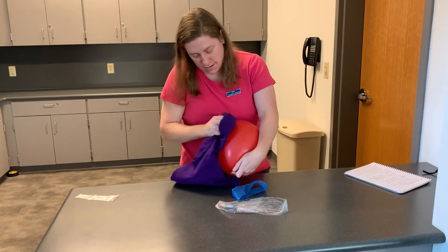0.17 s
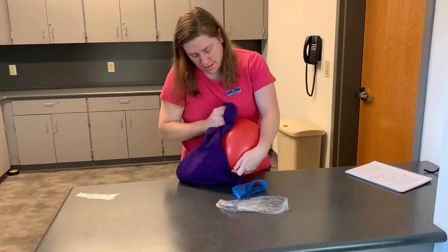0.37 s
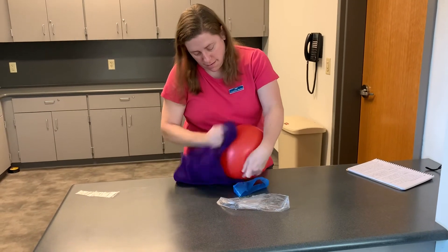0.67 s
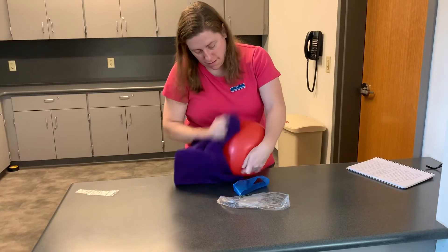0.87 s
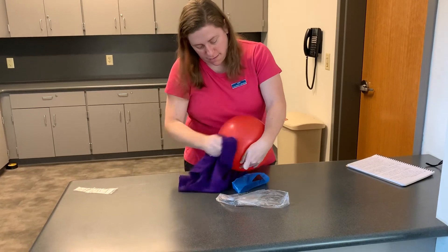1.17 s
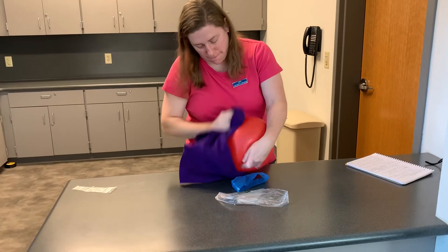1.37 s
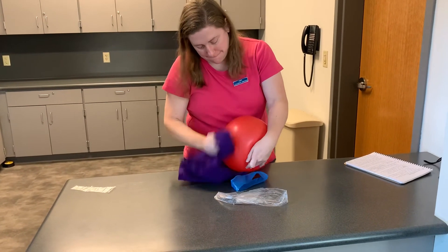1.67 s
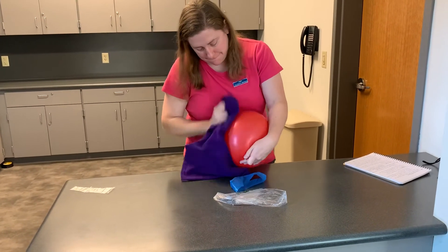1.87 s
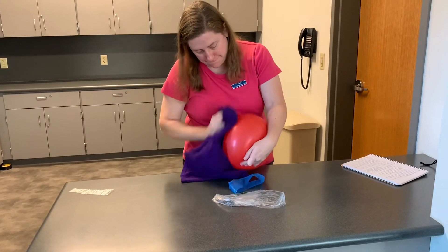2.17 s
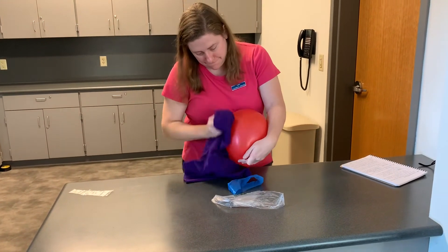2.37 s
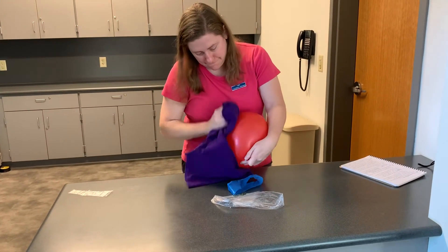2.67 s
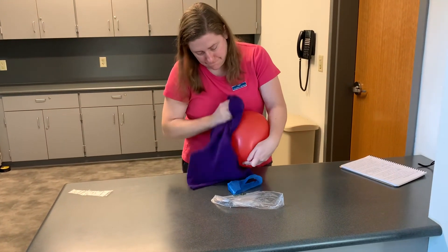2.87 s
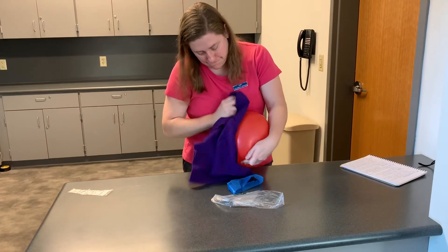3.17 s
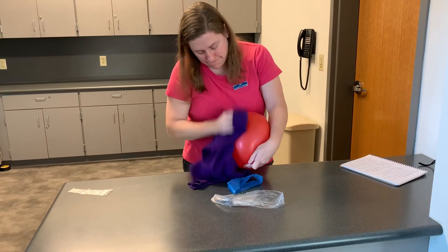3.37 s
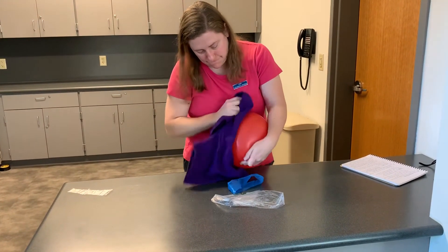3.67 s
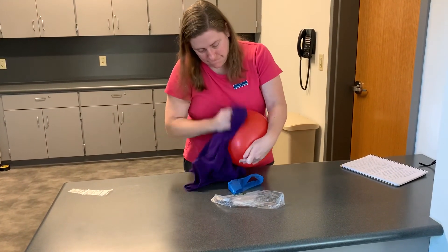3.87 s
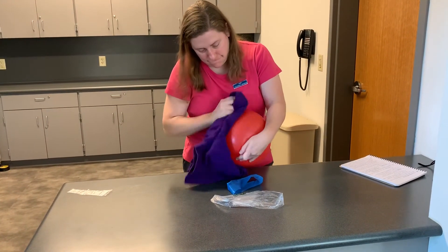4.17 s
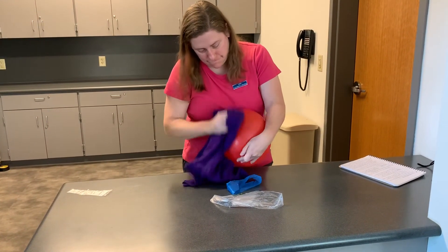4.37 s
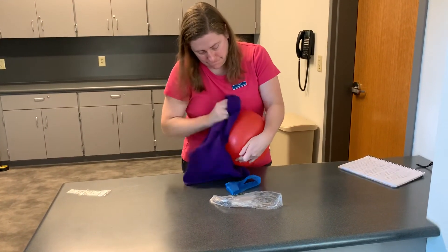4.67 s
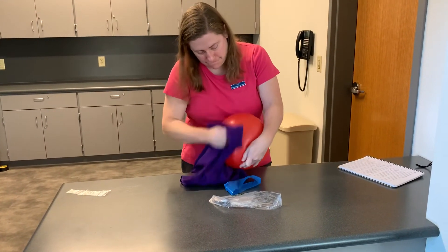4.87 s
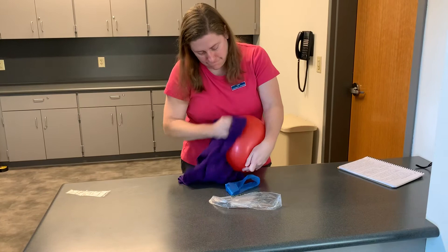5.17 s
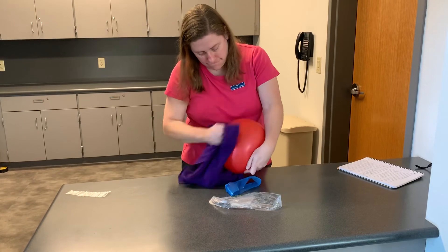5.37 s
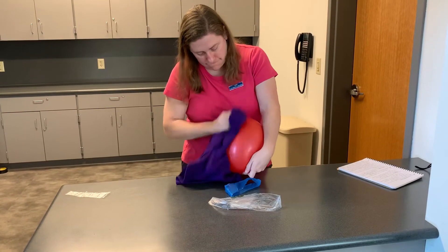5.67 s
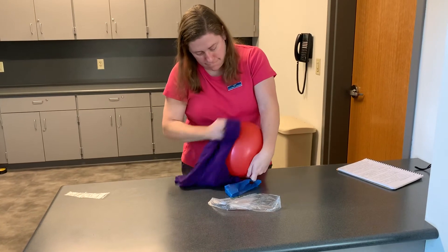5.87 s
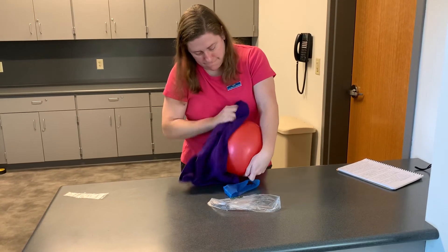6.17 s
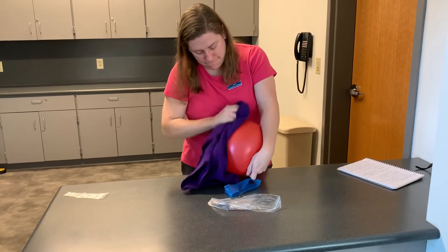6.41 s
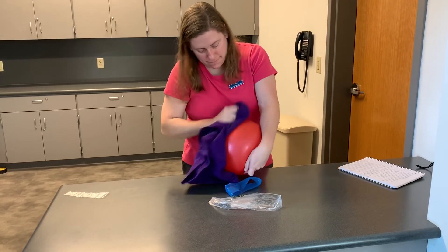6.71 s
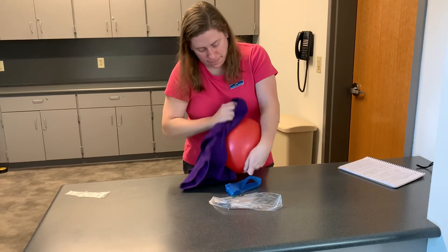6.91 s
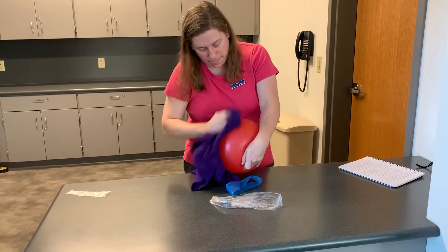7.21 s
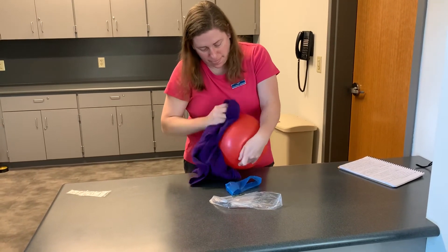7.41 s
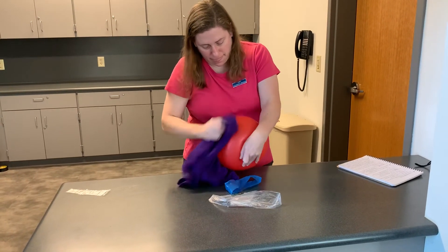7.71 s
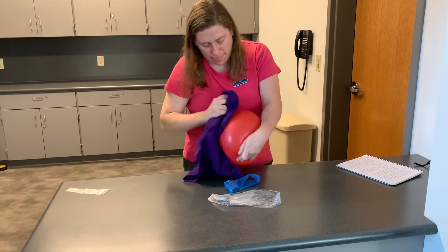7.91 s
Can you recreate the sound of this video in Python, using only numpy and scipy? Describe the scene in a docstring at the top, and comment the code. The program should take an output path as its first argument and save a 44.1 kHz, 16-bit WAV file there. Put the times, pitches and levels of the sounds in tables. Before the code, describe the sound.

A fuzzy cloth is rubbed rapidly back and forth on an inflated balloon, about eight strokes a second throughout. Each stroke is a short bright hiss with a coarser scrape and a hollow rubbery drumming underneath. Occasional soft double thumps ring the balloon. Close stereo pickup in a hard kitchen with a short reverberation, over low steady ventilation rumble.

```python
"""A fuzzy scrub goes to and fro, about eight strokes a second: a fleecy cloth on an inflated balloon. Fibres
hiss as shaped noise; coarser pile scrapes, and slips of the rubber ring the air and skin as resonances. Now and
then the fist bumps the balloon with soft paired pushes, and a hard-walled kitchen answers in decaying noise.
Ventilation rumbles behind as filtered noise, and a thin high sine comes and goes. All of it is heard in left
and right, and the treble reaches the two sides at different times."""
import sys
import numpy as np
from scipy import signal
from scipy.fft import rfft, irfft, next_fast_len
from scipy.io import wavfile
from scipy.ndimage import uniform_filter1d, map_coordinates

SR = 44100
rng = np.random.default_rng(int(sys.argv[2]) if len(sys.argv) > 2 else 0)


def bounce(signal):
    """Save signal as a 16-bit WAV file at the path given by the first command-line argument."""
    frames = np.transpose(np.atleast_2d(signal))
    limited = np.clip(frames, -1, 1)
    pcm = np.round(limited * 32767).astype(np.int16)
    wavfile.write(sys.argv[1], SR, pcm)


N = 355004

# strokes of the cloth, alternately away and back: middle_s, length_s, hiss_db (fibres), drum_db (balloon)
STROKES = [(0.053, 0.059, -43, -43), (0.155, 0.071, -49, -51), (0.254, 0.066, -78, -56.5),
           (0.354, 0.051, -42.0, -41.3), (0.449, 0.089, -53, -51.5), (0.577, 0.056, -44.5, -49),
           (0.701, 0.064, -48, -51), (0.807, 0.048, -45.0, -51.2), (0.921, 0.051, -44, -44),
           (1.027, 0.064, -45, -47.5), (1.151, 0.053, -47, -45), (1.279, 0.07, -43.5, -41),
           (1.433, 0.065, -46.8, -48.5), (1.558, 0.073, -44.5, -47.5), (1.685, 0.069, -45.5, -46),
           (1.81, 0.1, -47.5, -53.5), (1.963, 0.083, -49, -48), (2.096, 0.072, -46, -49.5),
           (2.234, 0.049, -47.5, -43), (2.37, 0.097, -50, -50), (2.52, 0.12, -57, -55),
           (2.623, 0.067, -45.5, -46), (2.751, 0.059, -50, -48), (2.874, 0.068, -46.5, -46.5),
           (3.012, 0.069, -48.5, -50), (3.138, 0.064, -45.0, -44), (3.278, 0.07, -46.0, -49.5),
           (3.405, 0.063, -45.5, -48), (3.529, 0.053, -48.5, -49.5), (3.65, 0.06, -44.0, -48.5),
           (3.777, 0.063, -48, -47.5), (3.891, 0.073, -46.5, -50), (4.033, 0.055, -47, -48.5),
           (4.142, 0.067, -45, -51), (4.275, 0.062, -44, -45), (4.404, 0.079, -45, -46),
           (4.55, 0.046, -46.0, -48), (4.667, 0.076, -44, -47), (4.814, 0.063, -48.0, -48),
           (4.948, 0.091, -47, -46.5), (5.107, 0.077, -48.5, -51), (5.223, 0.07, -45.5, -48.5),
           (5.34, 0.059, -48.5, -48.5), (5.444, 0.068, -45, -46.5), (5.584, 0.051, -51.5, -50.5),
           (5.7, 0.066, -44.5, -46.8), (5.83, 0.038, -57.0, -57), (5.941, 0.055, -45, -53.0),
           (6.06, 0.062, -49.5, -56.5), (6.172, 0.067, -45, -51), (6.298, 0.051, -49.5, -51.5),
           (6.411, 0.049, -47, -50.5), (6.539, 0.054, -50.0, -52.5), (6.657, 0.052, -47.0, -51),
           (6.784, 0.055, -49.5, -50.5), (6.901, 0.048, -45.5, -51.5), (7.021, 0.046, -47.5, -47),
           (7.13, 0.053, -48, -50.5), (7.26, 0.062, -47.5, -51), (7.375, 0.068, -50, -52),
           (7.494, 0.044, -47.5, -48), (7.595, 0.06, -46, -53), (7.738, 0.072, -47.5, -47),
           (7.868, 0.082, -47.5, -50), (8.021, 0.072, -48.5, -49.5)]
# resonances of the air inside the balloon: centre_hz, width_hz, level_db (relative)
CAVITY = [(445.7, 35.6, 3.5), (701, 58, -6), (903, 160, -5.5), (1116, 85, -6.5), (1440, 344, -12),
          (2074, 93, -9), (2255, 146, -13.5)]
# resonances of the balloon's skin: centre_hz, width_hz, level_db (relative)
SKIN = [(152, 195, -1), (235, 201, 2), (384, 226, -6.5)]

TOP_SHARE = 0.65  # top speed comes after this share of a stroke
LAG_AWAY, LAG_BACK = 0.091, -0.11  # the drumming peaks this share of a stroke after top speed


def amp(db):
    """Decibels to gain."""
    return 10 ** (np.asarray(db) / 20)


def unit(x):
    """Scaled to rms 1."""
    return x / np.sqrt(np.mean(x ** 2) + 1e-20)


def along(points, hz):
    """Reads a curve of (Hz, value) points on a log frequency axis."""
    f, v = np.transpose(points)
    return np.interp(np.log(hz + 1), np.log(f + 1), v)


def wobble(rate):
    """A smooth random curve, rate knots a second."""
    knots = rng.standard_normal(int(N * rate / SR) + 4)
    return map_coordinates(knots, [np.arange(N) * rate / SR])


def filtered(x, response):
    """Multiplies the spectrum of x by a (possibly complex) response of frequency."""
    m = next_fast_len(N + SR // 2)
    f = np.fft.rfftfreq(m, 1 / SR)
    return irfft(rfft(x, m) * response(f), m)[..., :N]


def modes(table, f):
    """Causal response of a set of resonances, neighbours in opposite polarity."""
    total = 0
    for k, (centre, width, db) in enumerate(table):
        damping = 1j * f * width
        total = total + (-1) ** k * amp(db) * damping / (centre * centre - f * f + damping)
    return total


def patchy(patchy_db, grain_db):
    """Two unrelated noises with shared patches of gain in time and pitch, and millisecond grain."""
    z = signal.stft(rng.standard_normal((2, N)), nperseg=512)[2]
    field = rng.standard_normal(z.shape[1:])
    field = uniform_filter1d(field, size=6, axis=0)  # smooth over frequency
    field = uniform_filter1d(field, size=8, axis=1)  # smooth over time
    pair = signal.istft(z * amp(patchy_db * unit(field)), nperseg=512)[1][:, :N]
    return pair * amp(grain_db * wobble(300))


def driven(gain, response, patchy_db, grain_db):
    """Grainy friction of the given gain excites a body, which rings on after each slip."""
    force = patchy(patchy_db, grain_db)
    # even out the loudness of different bodies
    power = np.abs(response(np.linspace(1, SR / 2, num=4096))) ** 2
    return filtered(unit(force) * gain, response) / np.sqrt(np.mean(power))


def swell(levels_db, stretch, blunt, rest_db, lagging=False):
    """Gain of one layer: a bell for each stroke, over the drag that remains while the arm turns."""
    t = np.arange(N) / SR
    power = np.full(N, amp(2 * rest_db))
    for k, ((middle, length, *_), db) in enumerate(zip(STROKES, levels_db)):
        near = slice(max(int((middle - .2) * SR), 0), int((middle + .2) * SR))
        lag = lagging * (LAG_BACK if k % 2 else LAG_AWAY)
        u = (t[near] - middle) / length + .5 - TOP_SHARE - lag  # stroke shares from the peak
        side = stretch * np.where(u < 0, TOP_SHARE, 1 - TOP_SHARE)  # slow rise, quicker fall
        power[near] += amp(2 * db) * np.exp(-abs(u / side) ** blunt)
    return np.sqrt(power)


def ventilation():
    """A steady air-handling rumble: noise shaped to a low, falling spectrum."""
    # rumble spectrum: pitch_hz, level_db_per_hz (relative)
    rumble = [(18, -38), (27, -4.5), (33, 0), (47, -0.5), (72, 0.5), (95, -8.5), (120, -6.5), (250, -14.5),
              (450, -17), (580, -26), (1000, -29.5), (2300, -30), (3400, -34.5), (16000, -51.5)]
    air = filtered(rng.standard_normal((2, N)), lambda f: amp(along(rumble, f)))
    return amp(-45.0) * unit(air)


def whine():
    """A faint, thin sine that comes and goes, in the first of the two fields only."""
    # loudness of the tone: time_s, level_db
    fades = [(0, -86), (1.9, -88), (2.2, -67), (2.8, -78), (3.1, -85), (4, -82), (4.4, -63), (4.9, -76),
             (5.2, -86), (8.05, -88)]
    pitch_hz = 8000
    t = np.arange(N) / SR
    gain = amp(np.interp(t, *np.transpose(fades)))
    return gain * np.sin(2 * np.pi * pitch_hz * t) * [[1], [0]]


def kitchen(x):
    """Echoes die at a speed set by frequency; two random patterns crossfade so the room's colour never stands still."""
    # reverberation: pitch_hz, t60_s (time to fall 60 dB)
    decay = [(200, 0.29), (1500, 0.22), (10000, 0.07)]
    delay = 300  # samples before the room answers
    hz, t, z = signal.stft(rng.standard_normal((2, 2, SR // 2)), SR, nperseg=256)
    fall_db = -60 * t / along(decay, hz)[:, None]
    tails = signal.istft(z * amp(fall_db), SR, nperseg=256)[1]
    tails = tails / np.linalg.norm(tails[0, 0])
    # steady crossfade between the two patterns, there and back every 0.8 s
    turn = np.arange(N + delay) / SR * np.pi / .8 + np.arange(2)[:, None, None] * np.pi / 2
    parts = np.pad(x, ((0, 0), (delay, 0))) * np.cos(turn) ** 2
    return signal.oaconvolve(parts, tails, axes=2).sum(0)[:, :N]


def fist():
    """Each bump is two soft pushes inward that ring the cavity and, lower, the skin; a shorter contact sounds harder."""
    # bumps through the cloth: start_s, push_db (rms of the push), skin_db (skin over air), contact_ms
    bumps = [(0.051, -29, -21, 0.32), (0.354, -24, -10, 0.71), (0.917, -25.5, 0.5, 2.5),
             (1.146, -33, 0, 0.6), (1.436, -28, 0, 1.9), (2.224, -27.5, -11, 1.2), (2.752, -34, 11, 1.16),
             (3.119, -33, -9, 0.61), (3.289, -28, -33, 1.4), (3.65, -35.5, 7, 2), (3.778, -32, -11, 1.25),
             (4.928, -35.5, 15, 1.8), (5.358, -29.5, 4.5, 1.27), (5.445, -37, 13.5, 1.3),
             (6.773, -23, -5, 0.69), (7.01, -17.5, -29, 0.93), (7.719, -24, -12, 1.5)]
    knuckle_s, knuckle_db = 0.00277, -3.5  # a second knuckle lands just after the first
    air, skin = np.zeros(N), np.zeros(N)
    for start, push_db, skin_db, contact_ms in bumps:
        push = -unit(signal.windows.hann(max(int(contact_ms * SR / 1000), 6)))
        for late, loss_db in ((0, 0), (knuckle_s, knuckle_db)):
            at = round((start + late) * SR)
            air[at:at + len(push)] += amp(push_db + loss_db) * push
            skin[at:at + len(push)] += amp(push_db + loss_db + skin_db) * push
    ringing_air = filtered(air, lambda f: modes(CAVITY, f))
    return ringing_air + filtered(skin, lambda f: modes(SKIN, f))


def body():
    """Coarser pile scrapes; slips of the rubber drum cavity and skin, late in one direction, early in the other."""
    # scrape spectrum: pitch_hz, level_db_per_hz (relative)
    pile = [(500, -32), (1100, -6), (1500, -4.5), (2300, -4.5), (3300, -4), (4600, -2), (6000, -27),
            (9000, -9.5)]
    scrape_over_db, scrape_follows = -2.5, 0.28  # over the drumming; share by which it follows the hiss
    air_over_db = 0.25  # cavity over the drumming
    skin_over_db, skin_heavy = 0.5, 0.39  # over the drumming; dB more for each dB drumming gains on hiss
    _, _, hiss_db, drum_db = np.transpose(STROKES)
    scrape_db = drum_db + scrape_over_db + scrape_follows * (hiss_db - drum_db)
    skin_db = drum_db + skin_over_db + skin_heavy * (drum_db - hiss_db)

    def hollow(f):
        """The cavity colours the scrape."""
        return amp(along(pile, f)) * abs(0.53 + 1.93 * modes(CAVITY, f))

    scrape_gain = swell(scrape_db, stretch=0.83, blunt=2.2, rest_db=-75.0)
    scrape = driven(scrape_gain, hollow, patchy_db=3.5, grain_db=1.0)
    air_gain = swell(drum_db + air_over_db, stretch=0.76, blunt=3.7, rest_db=-85.0, lagging=True)
    air = driven(air_gain, lambda f: modes(CAVITY, f), patchy_db=1.9, grain_db=4.0)
    skin_gain = swell(skin_db, stretch=0.63, blunt=2.24, rest_db=-78.5, lagging=True)
    skin = driven(skin_gain, lambda f: modes(SKIN, f), patchy_db=-0.24, grain_db=4.0)
    return scrape + air + skin


def fibres():
    """Fine fibres hiss over the rubber: bright noise that swells with each stroke."""
    # hiss spectrum: pitch_hz, level_db_per_hz (relative)
    fleece = [(2000, -30), (4000, -9), (6300, -2), (7600, -5), (8600, -1), (10000, 0), (12300, -3),
              (14000, -1), (16000, -2)]
    _, _, hiss_db, _ = np.transpose(STROKES)
    gain = swell(hiss_db, stretch=1.0, blunt=3.5, rest_db=-55.0)
    return driven(gain, lambda f: amp(along(fleece, f)), patchy_db=2.15, grain_db=0.5)


def ports(pair):
    """Two fields become left and right: shared part, level lean and phase lead by frequency."""
    # likeness of the two ports: pitch_hz, likeness (0-1)
    alike = [(60, 0.97), (400, 0.91), (700, 0.7), (1500, 0.48), (2800, 0.48), (4500, 0.93), (5800, 0.088),
             (6600, 1), (16000, 1)]
    # level lean: pitch_hz, left_minus_right_db
    lean = [(60, -1.5), (300, 0.5), (1200, 0.6), (3000, 0), (4500, -2.5), (5500, -5.5), (6600, -0.5),
            (16000, 0.5)]
    # phase lead: pitch_hz, left_leads_rad
    lead = [(0, 0), (1500, 0), (2700, 1.3), (5200, 1.5), (5900, 0), (6500, 0), (8500, -3.14),
            (11000, -6.28), (13350, -9.42), (15600, -12.57), (22050, -12.57)]

    def split(f):
        """Gains of the shared and the opposed part."""
        turn = np.arccos(np.clip(along(alike, f), -1, 1)) / 2
        return np.array([np.cos(turn), np.sin(turn)])

    def tilt(f):
        """Half of lean and lead goes to the left, the inverse to the right."""
        half = amp(along(lean, f) / 2) * np.exp(.5j * np.interp(f, *np.transpose(lead)))
        return np.array([half, 1 / half])

    shared, own = filtered(pair, split)
    return filtered(np.array([shared + own, shared - own]), tilt)


def scene():
    """The balloon in the kitchen, the ventilation and the tone, at the two ports."""
    balloon = body() + fist() * [[1], [.3]]
    room = amp(-7.0) * kitchen(balloon)
    return ports(fibres() + balloon + room + ventilation() + whine())


def record(dry):
    """Nothing is kept above the band limit."""
    top_hz = 15780
    return filtered(dry, lambda f: f < top_hz)


dry = scene()
out = record(dry)
bounce(out)
```